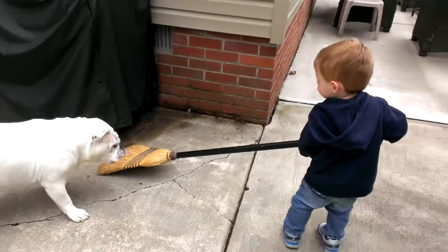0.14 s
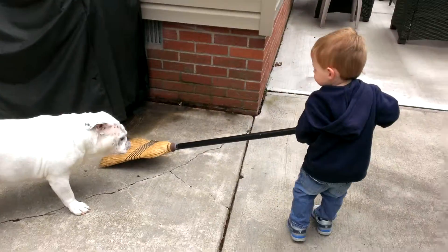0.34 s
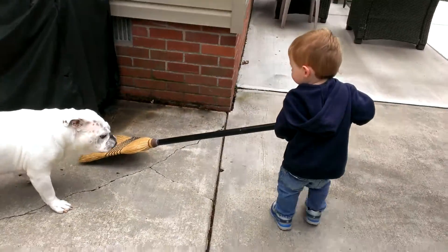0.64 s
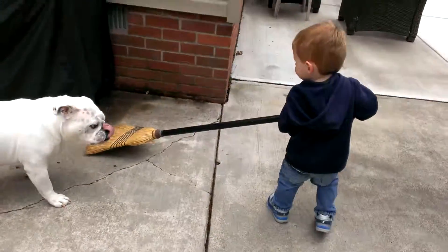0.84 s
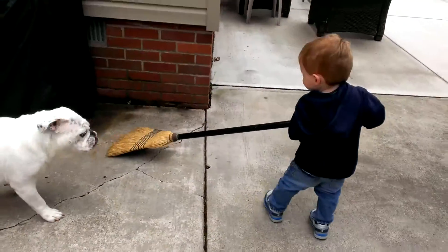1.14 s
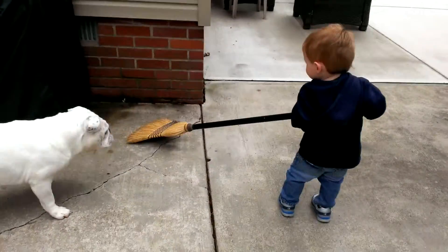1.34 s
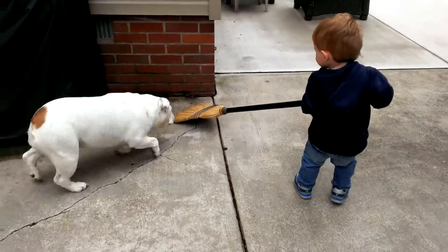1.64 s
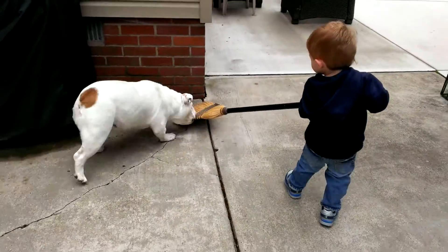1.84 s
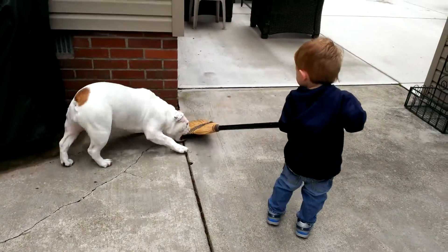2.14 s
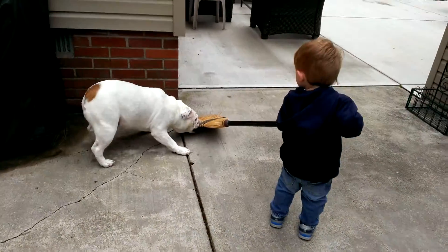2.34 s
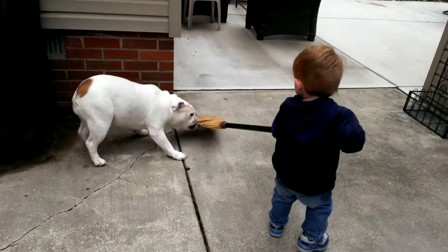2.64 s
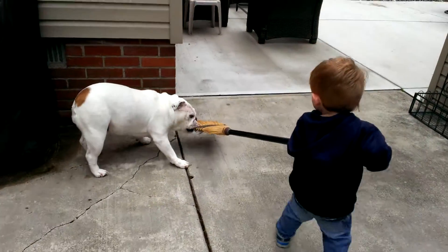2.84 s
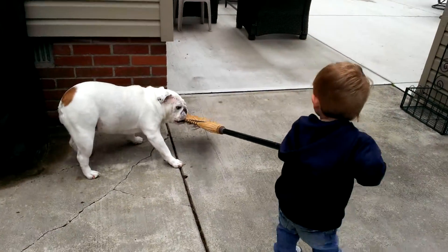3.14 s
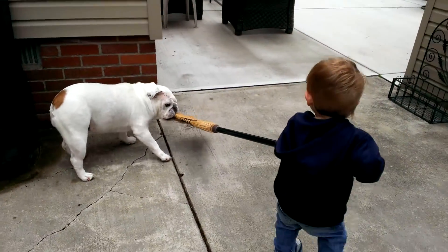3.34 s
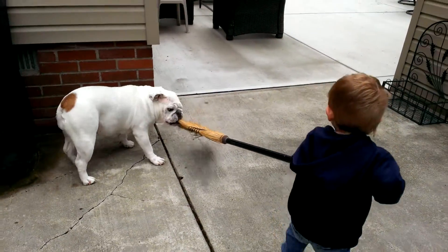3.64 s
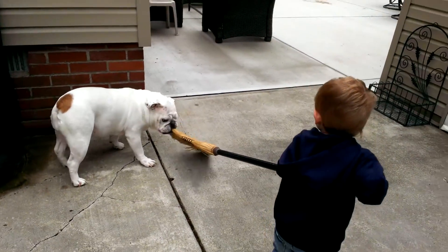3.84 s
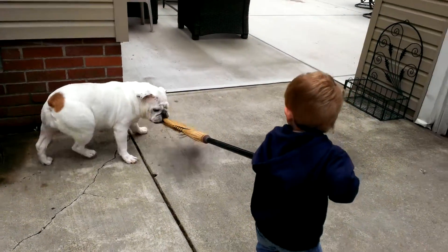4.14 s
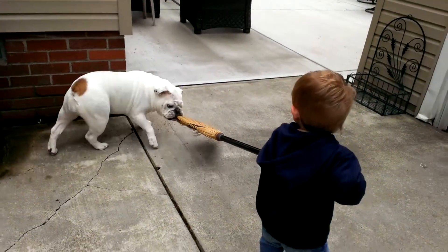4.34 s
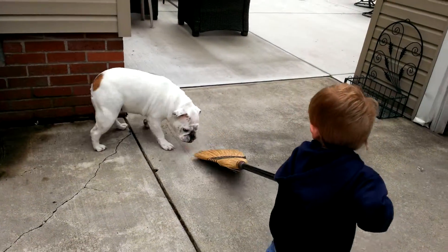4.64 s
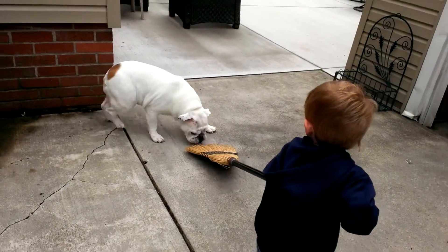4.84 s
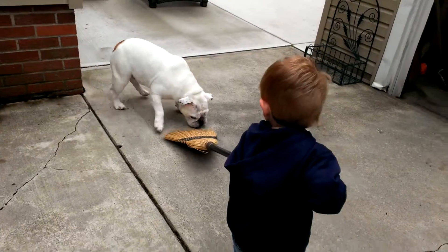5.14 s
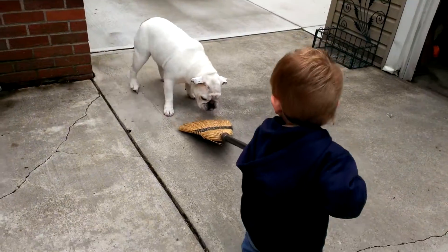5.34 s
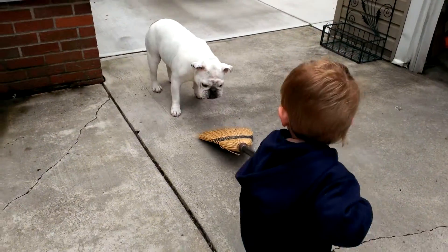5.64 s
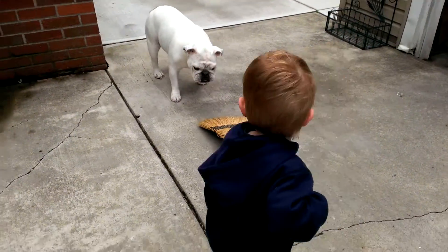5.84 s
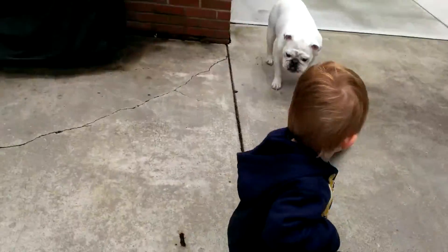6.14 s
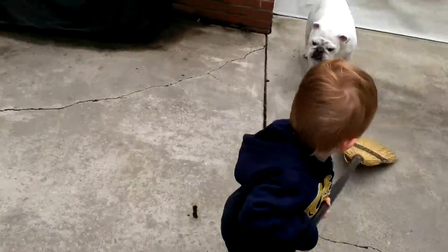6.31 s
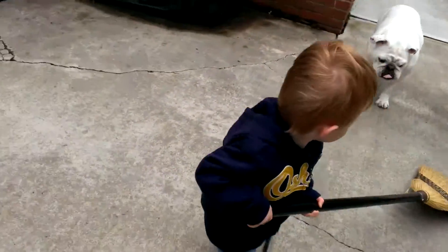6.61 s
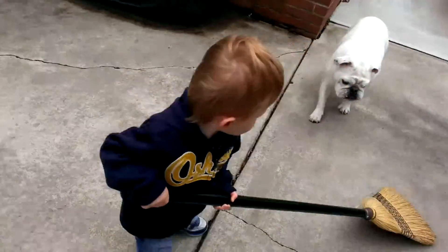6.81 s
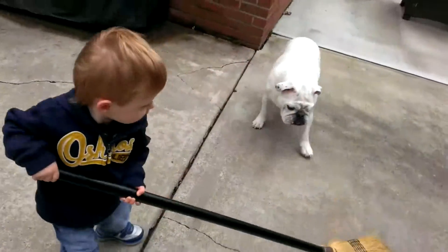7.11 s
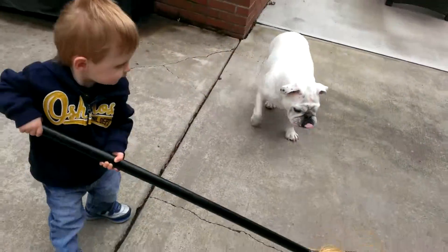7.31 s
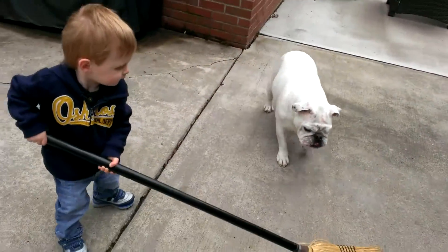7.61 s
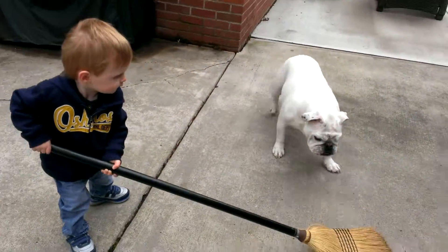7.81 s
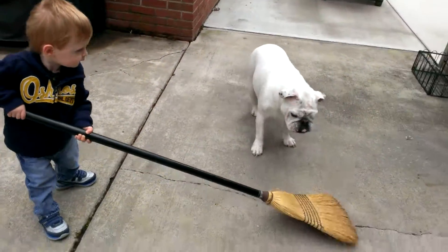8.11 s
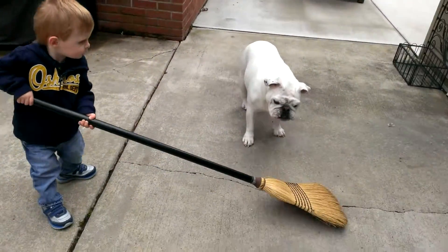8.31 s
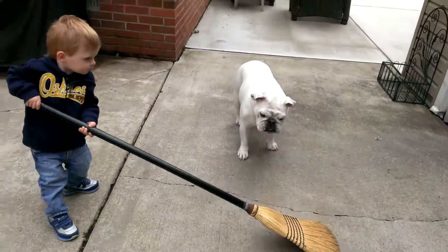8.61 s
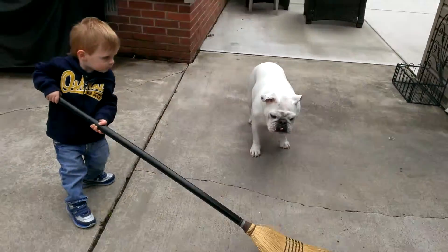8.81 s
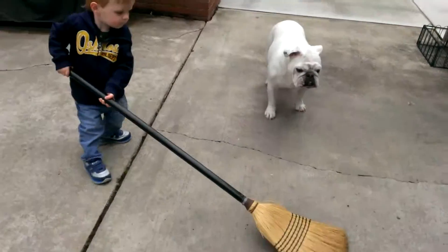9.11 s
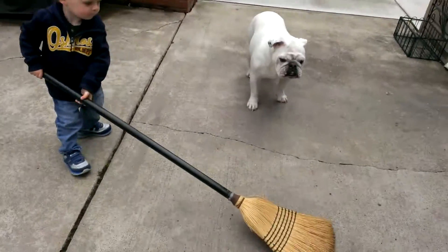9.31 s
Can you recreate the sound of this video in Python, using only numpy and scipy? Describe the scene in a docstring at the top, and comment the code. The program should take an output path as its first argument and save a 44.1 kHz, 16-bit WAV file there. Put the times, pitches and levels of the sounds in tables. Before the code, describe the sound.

A straw broom scrapes and hisses over rough concrete in uneven scuffs and long drags, with small knocks, straw snaps and close handling bumps.

```python
"""A concrete yard: a straw broom is dragged near a hand-held phone while a dog paws and bites at it.
The broom is noise shaped by the force on its straws, with snaps and gliding bands of noise on top.
Knocks are ringing modes; the dog's huffs and the fingers on the case are shaped, uneven noise.
Far traffic is broad noise and the hum a narrow band of it.
The phone hears through two ports of opposite polarity: a bright one (left) and a shaded one (right)."""
import sys
import numpy as np
from scipy.fft import rfft, irfft, next_fast_len
from scipy.io import wavfile
from scipy.ndimage import map_coordinates

SR = 44100
rng = np.random.default_rng(int(sys.argv[2]) if len(sys.argv) > 2 else 0)


def wav_record(signal):
    """Record a signal, one row per channel, as 16-bit PCM in the file named by sys.argv[1]."""
    frames = np.transpose(np.atleast_2d(signal))
    bounded = np.clip(frames, -1, 1)
    # unit amplitude maps onto the largest positive 16-bit level
    quanta = np.round(bounded * 32767).astype(np.int16)
    wavfile.write(sys.argv[1], SR, quanta)


N = 417186  # samples, about 9.46 s
TIME = np.arange(N) / SR  # seconds


def amp(db):
    """Turn dB into a plain gain."""
    return 10 ** (np.asarray(db) / 20)


def unit(x):
    """Rms 1 for a signal; for a pair, rms 1 for half of what both ports give."""
    share = .5 if x.ndim > 1 else 1
    return x / np.sqrt(np.mean(x ** 2) * share + 1e-20)


def along(points, hz):
    """Read each value column of a spectrum table on a log frequency axis."""
    point_hz, *columns = np.transpose(points)
    return np.squeeze([np.interp(np.log(hz + 1), np.log(point_hz + 1), c) for c in columns])


def curves(rows, time=TIME):
    """One value per moment for each column after the time."""
    seconds, *columns = np.transpose(rows)
    return np.array([np.interp(time, seconds, c) for c in columns])


def wobble(rate, size=N):
    """A smooth random curve through random points, rate points a second."""
    points = rng.standard_normal(int(size * rate / SR) + 4)
    return map_coordinates(points, [TIME[:size] * rate])


def filtered(x, response):
    """Multiply the spectrum of x by a response of frequency."""
    size = next_fast_len(N + 8192)
    hz = np.fft.rfftfreq(size, 1 / SR)
    return irfft(rfft(x, size) * response(hz), size)[..., :N]


def coloured(x, points):
    """Shape x with a spectrum table, silent well outside it, then bring it to unit level."""
    lowest_hz, highest_hz = points[0][0] / 2, 2 * points[-1][0]

    def response(hz):
        return amp(along(points, hz)) * (hz > lowest_hz) * (hz < highest_hz)

    return unit(filtered(x, response))


def sides(pan_db):
    """Gains of the two ports for a left-right difference in dB; their total power stays the same."""
    tilt = amp(np.multiply.outer([.5, -.5], pan_db))
    return tilt / np.cosh(pan_db * np.log(10) / 20) ** .5


def narrow(hz, width):
    """A narrow band of noise round a moving pitch, rms 1; a larger width makes it broader."""
    turns = 2 * np.pi * np.cumsum(hz) / SR
    in_step = wobble(width, size=len(hz)) * np.cos(turns)
    quarter_turn = wobble(width, size=len(hz)) * np.sin(turns)
    return unit(in_step + quarter_turn)


FADE_DB = 20  # what a rise or a fall covers in its time


def touch(full_at, rise, hold, fall, db):
    """Gain of one contact: it rises, holds and falls along straight lines in dB."""
    before = (full_at - TIME) / rise
    after = (TIME - full_at - hold) / fall
    return amp(db - FADE_DB * np.maximum(0, np.maximum(before, after)))


# Tone of the far sound. Each row: frequency in Hz, strength in dB.
YARD_SPECTRUM = [(25, -4.5), (45, -28.5), (70, 0), (110, 1.5), (200, -4.5), (400, -15), (1000, -17),
                 (2500, -26), (5000, -21), (10500, -39)]
# Loudness of the far sound. Each row: time in seconds, level in dB.
YARD_LEVEL = [(0, -60.5), (1, -60.5), (3, -62), (5.5, -59.5), (8.3, -60), (9.46, -58.5)]
# How alike the ports hear it. Each row: frequency in Hz, likeness from 0 to 1.
PORT_LIKENESS = [(30, 0.57), (100, 1), (400, 0.78), (1000, 0.57), (3000, 0.41), (10000, .1)]
# How far sound differs between the ports. Each row: frequency in Hz, left minus right in dB.
FAR_TILT = [(100, -2), (1000, 2.5), (3500, -3), (6000, 8), (10500, 25)]
# Loudness of the hum. Each row: time in seconds, level in dB.
HUM_LEVEL = [(0, -68.5), (2, -61.5), (4, -60), (5.3, -55.5), (7, -63), (9.46, -74)]


def yard():
    """Far traffic as broad noise, most alike in the ports near 100 Hz, and a wavering low hum."""
    common, *own = rng.standard_normal((3, N))
    shared = filtered(common, lambda hz: along(PORT_LIKENESS, hz) ** .5)
    separate = filtered(np.array(own), lambda hz: (1 - along(PORT_LIKENESS, hz)) ** .5)

    def far_response(hz):
        return amp(along(YARD_SPECTRUM, hz)) * sides(along(FAR_TILT, hz))

    far = unit(filtered(shared + separate, far_response))
    hum = amp(curves(HUM_LEVEL)[0]) * narrow(np.full(N, 112.), 22)  # round 112 Hz
    far_level_db = curves(YARD_LEVEL)[0] + 0.66 * wobble(4.4)
    return amp(far_level_db) * far + hum


# Fingers bump the case.
# Each row: full at this second, rise, hold and fall in seconds, level in dB, left minus right in dB.
BUMPS = [(0.858, 0.037, .003, 0.025, -40, -30), (1.082, 0.036, 0.026, 0.069, -54, -13),
         (8.741, 0.0064, 0.035, .12, -35, -1), (8.825, 0.048, 0.018, 0.18, -35.5, 1.5),
         (8.943, .015, .003, .07, -42.5, -6), (8.99, 0.03, .003, 0.09, -31.5, -4.5),
         (9.025, .04, 0.0028, 0.06, -31, 0.5), (9.084, 0.09, .012, 0.017, -39, -4),
         (9.341, 0.032, 0.025, 0.13, -49, -1)]
# Tone of a bump. Each row: frequency in Hz, strength in dB.
THUD_SPECTRUM = [(50, -19), (90, -2), (250, -5), (450, -12), (800, -18.5), (1500, -49)]
# Fingers rub the case. Each row: full at this second, rise, hold and fall in seconds, level in dB,
# left minus right in dB, speed from 0 to 1.
RUBS = [(0.861, 0.043, 0.019, .016, -42, -25, 0.51), (1.088, 0.019, 0.061, .028, -37.5, -26, 0.8),
        (3.13, .015, .025, .03, -61.5, 3, 0.4), (8.742, .007, 0.036, 0.1, -44.5, -1, 0.54),
        (8.828, 0.094, 0.025, 0.085, -48.5, -1, 0.2), (8.956, 0.033, 0.018, 0.036, -34, -27, 0.3),
        (8.986, 0.032, 0.011, 0.028, -32, -16, .65), (9.027, .04, .003, .1, -49.5, -4, 0.2),
        (9.083, 0.047, 0.017, .012, -43, -11, 0.1), (9.345, 0.078, .003, 0.066, -59, 2, 0.7)]
# Tone of a rub. Each row: frequency in Hz, strength of a slow rub in dB, of a fast rub in dB.
RUB_SPECTRA = [(402, -7, -26), (816, -0.5, -18.5), (1270, -1, -8), (1500, -6, 2), (1970, -24.5, 0),
               (2460, -9.5, -12.5), (3020, -9.5, -10), (5000, -35, -16.5), (8000, -41, -38)]


def grip():
    """Skin sticks and slips on the case: lumpy low thuds and rougher rubs, each leaning to a port."""
    common, *own = rng.standard_normal((3, N))
    lumps = amp(2.3 * wobble(60))
    thud = coloured(lumps * (common + 0.28 * np.array(own)), THUD_SPECTRUM)

    stick_slip = amp(2.0 * wobble(250))
    rub_noise = stick_slip * rng.standard_normal((2, 1, N))
    slow, fast = coloured(rub_noise, RUB_SPECTRA).swapaxes(0, 1)

    # the powers of all bumps add
    bump_power = sum((sides(pan_db)[:, None] * touch(*shape)) ** 2 for *shape, pan_db in BUMPS)
    out = np.sqrt(bump_power) * thud
    for *shape, pan_db, speed in RUBS:
        rub = (1 - speed) * slow + speed * fast  # a faster finger sounds brighter
        out += sides(pan_db)[:, None] * touch(*shape) * rub
    return out


# The dog breathes out.
# Each row: full at this second, rise, hold and fall in seconds, level in dB.
PANTS = [(0.543, .03, 0.2, .1, -59), (1.57, .04, 0.22, .1, -60), (2.806, 0.022, 0.21, 0.17, -58)]
# Tone of the snout. Each row: frequency in Hz, strength in dB.
SNOUT_SPECTRUM = [(700, -25), (1000, -7), (1150, 2), (1350, 4), (1550, 2), (1900, -5), (2600, -21),
                  (3200, -4), (3700, -24)]


def dog():
    """Soft, uneven breath noise, coloured by a short snout."""
    flutter = amp(2.5 * wobble(40.46))
    air = coloured(flutter * rng.standard_normal(N), SNOUT_SPECTRUM)
    return sides(1.5)[:, None] * sum(touch(*row) for row in PANTS) * air


# Teeth, claws, shoes and the handle knock, and fingers knock the phone case.
# Each row: start in seconds, level in dB, pitch in Hz, time to fade by 60 dB in seconds,
# left minus right in dB.
KNOCKS = [(.295, -48, 983, 0.089, -1), (0.392, -31, 193, 0.04, -15), (.98, -39.5, 650, 0.094, 2.5),
          (1.304, -47.5, 743, 0.087, 3), (1.751, -36, 2600, 0.069, -4), (1.907, -47, 298, .03, 6),
          (2.162, -44.5, 760, 0.095, 5), (2.164, -48.5, 200, .05, -1), (2.697, -35.5, 2330, 0.0098, 11),
          (3.165, -36, 203, 0.05, 0.5), (3.2345, -20.5, 2130, 0.013, -9), (3.2375, -19, 1900, 0.005, -18),
          (3.2403, -22, 2540, 0.015, 17.5), (3.251, -32, 2430, 0.031, -3), (3.85, -52.5, 694, 0.066, 5),
          (3.85, -52, 2500, 0.028, -7), (4.994, -37.5, 162, 0.064, -8), (5.9, -46, 3030, 0.016, -12),
          (6.077, -32.5, 298, 0.027, 12), (6.14, -41, 1980, .015, 10), (6.164, -45, 490, 0.027, 4),
          (6.612, -26, 2700, 0.0089, -22), (6.635, -31, 2470, 0.012, -21), (6.668, -26.5, 249, 0.023, -12),
          (6.669, -28, 1700, 0.0049, -22), (6.683, -36, 2220, 0.013, -12), (7.355, -29, 191, 0.044, -6.5),
          (7.72, -34, 199, 0.037, -3), (7.768, -34, 1540, 0.017, 2), (7.773, -35, 2200, 0.015, 5),
          (8.735, -23.5, 250, 0.075, -0.5), (8.753, -24.5, 253, 0.086, 11), (8.765, -34, 298, 0.06, -8),
          (8.797, -38, 330, 0.046, 12), (8.991, -25, 1026, 0.028, 13), (9.023, -36, 443, 0.033, 11),
          (9.321, -41, 2040, 0.039, 2)]
# Modes of a knocked thing, before small random changes.
# Each row: multiple of the knock's pitch, strength in dB.
BODY_MODES = [(.5, -13.5), (0.649, -10), (.8, -2), (.93, -2), (1.08, 3), (1.3, -2.5), (1.6, -7.5),
              (2.05, -9), (2.7, -13.5)]


def knocks():
    """A knock rings the modes round its pitch; the contact eases in over less than two cycles."""
    out = np.zeros((2, N + SR))
    t = np.arange(SR // 8) / SR
    ratio, mode_db = np.transpose(BODY_MODES)[:, :, None]
    for start, db, hz, t60, pan_db in KNOCKS:
        shift, level, phase = rng.standard_normal((3, len(BODY_MODES), 1))
        mode_hz = hz * ratio * np.exp(0.0507 * shift)
        modes = amp(mode_db + 4.0 * level) * np.sin(2 * np.pi * mode_hz * t + 1.21 * phase)
        ring = unit(modes.sum(axis=0))
        contact = np.sin(np.pi / 2 * np.clip(t * hz / 1.67, 0, 1)) ** 2
        fade = amp(db - 60 * t / t60)
        out[:, round(start * SR):][:, :len(t)] += sides(pan_db)[:, None] * fade * contact * ring
    return out[:, :N]


# Gliding bands of broom noise, coloured by reflections off floor or wall as the broom moves.
# Each row: start in seconds, length in seconds, first pitch in Hz, last pitch in Hz,
# rough width in Hz, top level in dB, share of the length (0 to 1) at which it is loudest.
GLIDES = [(0.906, 0.41, 3560, 3740, 400, -55, 0.27), (1.296, 0.48, 3820, 3850, 501, -64, 0.76),
          (4.27, 0.21, 4180, 4100, 450, -63, .5), (4.323, 0.18, 3300, 3300, 895, -60.5, 0.75),
          (5.497, 0.33, 3720, 3350, 421, -57.5, .3), (5.504, 0.2, 4200, 4000, 596, -57, .6),
          (6.36, .42, 3650, 4150, 280, -52.5, 0.54), (6.38, .75, 4300, 5100, 297, -56, .4),
          (6.422, .35, 9250, 9150, 700, -45, .4), (6.9, .46, 9400, 8820, 700, -39, .35),
          (6.849, .55, 5600, 6900, 500, -53, .7), (6.7, .75, 3700, 4820, 300, -49, 0.31),
          (7.0, .54, 3470, 3900, 303, -48, 0.77), (7.979, 0.29, 3300, 3200, 1300, -56, .5),
          (8.399, .5, 3950, 3910, 451, -54, .4)]
SWELL_DB = 8.5  # how far under its top level a glide starts and ends
GLIDE_PAN_DB, PAN_DB_PER_KHZ = -14, 8  # left minus right at 4 kHz; higher pitch favours the bright port


def glides():
    """Reflections off floor or wall colour the moving broom: narrow noise bands glide, swell and go."""
    out = np.zeros((2, N))
    for start, length, first_hz, last_hz, width_hz, db, top in GLIDES:
        progress = np.linspace(0, 1, round(length * SR))
        size = len(progress)
        swell_db = db - SWELL_DB * np.interp(progress, [0, top, 1], [1, 0, 1])
        hz = first_hz + (last_hz - first_hz) * progress
        ports = sides(GLIDE_PAN_DB + PAN_DB_PER_KHZ * (hz / 1000 - 4))
        band = narrow(hz + 60 * wobble(25, size=size), width_hz)  # the pitch wavers
        out[:, round(start * SR):][:, :size] += ports * amp(swell_db) * band
    return out


# Long drags of the broom, one list each. Each row: time in seconds, tip hiss in dB,
# stalk rasp in dB against the hiss, head drag in dB against the hiss.
DRAGS = [
    [(.84, -69.5, 1.5, -16), (1.0, -46.5, -6.5, -10), (1.15, -45.5, -5, -10), (1.4, -47.5, -5.5, -16),
     (1.71, -48.5, -2.5, -13), (1.76, -43, -5, -16), (1.8, -53.5, -1.5, -11.5), (2.0, -63.5, -2, -6)],
    [(6.11, -63.5, -9, -2.5), (6.32, -49.5, -16, -12.5), (6.44, -38, -26, -23.5), (6.59, -35.5, -27.5, -24),
     (6.8, -38, -20.5, -18), (7.03, -34, -22, -26.5), (7.32, -36.5, -14, -19.5), (7.4, -41.5, -8.5, -12.5),
     (7.48, -41.5, -9.5, -19), (7.56, -59.5, -12, -7)],
    [(8.14, -83.5, 11, 18), (8.27, -53, -7.5, -15), (8.32, -49.5, -11, -17), (8.43, -53, -2, -14),
     (8.77, -48, -2.5, -17), (8.95, -43, -6, -22), (9.06, -47, -8.5, -9), (9.1, -57, -5, 2),
     (9.27, -74.5, -2, -6)],
]
# Short scuffs of the broom. Each row: full at this second, rise, hold and fall in seconds,
# tip hiss in dB, stalk rasp in dB against the hiss, head drag in dB against the hiss.
SCUFFS = [(0.175, 0.53, 0.19, 0.078, -57, -1, -7.5), (0.497, 0.16, 0.0043, .12, -65, 0.5, -2),
          (0.663, 0.16, 0.26, .2, -73, 6, 4.5), (2.028, 0.034, 0.11, 0.18, -52, -0.5, -14),
          (2.288, 0.064, 0.042, 0.17, -46, -4, -17.5), (2.501, 0.11, .01, 0.095, -55, -4.5, -13),
          (2.641, .025, 0.011, 0.086, -58, -9, -5.5), (2.922, 0.029, .005, 0.3, -65, -7.5, -8),
          (3.19, 0.083, 0.052, 0.27, -63, -1.5, 3), (3.243, 0.032, 0.019, 0.038, -46.5, -19, -11),
          (3.706, 0.17, .02, 0.25, -66.5, -3.5, -5), (3.85, 0.032, 0.018, 0.067, -68.5, -1.5, -2),
          (4.043, 0.18, .05, 0.15, -67.5, -4.5, -20), (4.098, .04, .02, 0.04, -62.5, -1, -3.5),
          (4.38, 0.24, .005, 0.25, -58, -4.5, -9.5), (4.559, 0.029, .005, 0.052, -52.5, -7.5, -32),
          (4.639, 0.035, .05, 0.11, -49.5, -6, -23), (4.821, 0.03, .005, 0.029, -54.5, -5.5, -10),
          (4.86, 0.11, 0.18, 0.078, -62.5, -5.5, -24), (5.09, 0.066, .005, 0.033, -59.5, -5, -13),
          (5.145, 0.035, .05, 0.028, -51.5, -9, -14), (5.217, .06, 0.046, 0.12, -63.5, 3, -13),
          (5.302, .04, 0.0055, 0.09, -51.5, -5, -15), (5.413, 0.35, .21, 0.41, -59, -0.8, -25),
          (5.584, .12, .02, 0.18, -62, 1, 1.5), (5.952, .27, 0.15, .3, -60.5, -8.5, -8),
          (7.655, 0.42, .005, 0.19, -49.5, -6.5, -15.5), (7.758, 0.13, .005, 0.062, -51, -8, -5.5),
          (7.79, .1, 0.12, 0.099, -54.5, -6.5, -16), (7.984, 0.26, 0.098, 0.059, -54.5, -7, -13.5),
          (9.365, 0.068, 0.11, .1, -50, -3.5, -16)]
# The broom barely touching, one row: hiss, rasp and drag in dB.
REST_DB = [-89, -89, -70.5]


def pressure():
    """Gains of hiss, rasp and drag: the powers of all contacts add."""
    power = np.zeros((3, N)) + amp(REST_DB)[:, None] ** 2
    for rows in DRAGS:
        hiss_db, stalk_db, head_db = curves(rows)
        during = (TIME > rows[0][0]) * (TIME < rows[-1][0])
        power += amp([hiss_db, hiss_db + stalk_db, hiss_db + head_db]) ** 2 * during
    for *shape, stalk_db, head_db in SCUFFS:
        power += (amp([[0], [stalk_db], [head_db]]) * touch(*shape)) ** 2
    return np.sqrt(power)


# Snaps of straw and claws. Each row: start in seconds, level in dB before SNAP_TRIM_DB,
# stalk in dB against that level, head in dB against that level.
SNAPS = [(0.314, -35.5, -6, -13), (.7108, -47, -1, -13), (1.7509, -25.5, -23, -27), (1.8876, -37, -14, -21),
         (1.921, -39.5, 0, -14), (2.0158, -37, -19, -24), (2.2166, -33, -7, -10.5),
         (2.4583, -38.5, -1, -28), (2.499, -36.5, -3, -26), (2.5555, -42.5, 1.5, -0.5),
         (2.6364, -37, -3.5, -18), (2.696, -49, 1.5, -2), (3.3598, -43, -13, -24), (3.675, -46, -3, -15),
         (3.714, -43.5, -14, -19), (4.065, -46, -6, -19), (4.5595, -36, -19, -36), (4.6794, -39, -14, -33),
         (4.8155, -43, -14, -21), (4.8963, -39, 0, -11), (5.062, -40, -11, -12),
         (5.1334, -28.5, -14.5, -26), (5.1664, -42, -21, -23), (5.1767, -31, -17, -29),
         (5.295, -33, -4.5, -41), (7.6547, -28, -18, -30), (7.6964, -30, -18, -22),
         (7.748, -29.5, -15, -10), (7.846, -34, -20, -26), (7.9606, -29, -9, -28), (7.985, -26, -10, -31),
         (8.0187, -29.5, -6.5, -25), (9.1508, -38.5, -14, -5), (9.3204, -38.5, 9, -14),
         (9.416, -30, -19, -30)]
SNAP_TRIM_DB, SNAP_SHADED_DB = -7.0, -14  # for the whole snap; for its extra part in the shaded port
SNAP_T60_S, SNAP_RISE_S = 0.031, .0011
# Tones of the straw tips, the stalks, the shaded port's extra part and the broom head.
# Each row: frequency in Hz, strength in the left port in dB, in the right port in dB.
TIP_SPECTRUM = [(4350, -22, -35.5), (5360, -51, -22.5), (6700, -11, -19.5), (7620, -3, -24), (9260, 8, -35),
                (10300, -2.5, -35), (10890, -2.5, -34)]
STALK_SPECTRUM = [(3660, -31, -25.5), (4920, 3, -23.5), (5970, 2, -10), (6230, 2, -23), (7180, -6.5, -23),
                  (8100, -8, -28)]
SHADED_SPECTRUM = [(2060, -47, -44.5), (3080, -12.5, 2.5), (3760, -7, 5.5), (4600, -6.5, 2),
                   (5900, -40, -15.5)]
HEAD_SPECTRUM = [(298, -5, -5), (684, -9.5, -6), (1590, 2.5, -0.5), (2750, -0.5, 0), (3440, -18, -19.5)]
# How bright the tip hiss is as the straws bend. Each row: time in seconds, guide frequency in Hz.
BRIGHTEST = [(0, 9500), (1.1, 9450), (2.5, 10360), (3, 9400), (4.5, 10500), (5.3, 9650), (5.9, 8400),
             (6.35, 9650), (6.9, 9830), (7.2, 9300), (7.45, 9000), (7.7, 9400), (8.4, 8960), (9.46, 9170)]
# The phone and broom turn.
# Each row: time in seconds, level of the shaded part in dB while the hiss is at -60 dB.
SHADED_LEVEL = [(0, -64.5), (1.1, -61), (1.5, -65), (2.4, -65), (2.9, -67.5), (3.25, -65), (4.0, -71),
                (4.4, -69.5), (4.6, -70.5), (5.4, -70.5), (5.62, -69), (5.9, -66), (6.5, -67), (7.4, -65.5),
                (7.9, -67), (8.15, -61), (8.4, -66), (9.1, -63), (9.46, -64.5)]
SHADED_GROWS = 0.54  # dB in the shaded part for each dB of hiss
# The phone turns. Each row: time in seconds, delay of the left port in seconds.
LEFT_LAG = [(0, -.0004), (3.7, -.0004), (4.2, .0001), (6, .00017), (9.46, .00016)]


def broom():
    """Straws catch on the grit and let go, as clumpy noise; both ports hear partly the same slips."""
    hiss, stalk, head = pressure()
    shaded = amp(curves(SHADED_LEVEL)[0]) * (hiss * 1000) ** SHADED_GROWS
    force = np.array([hiss, stalk, shaded, head])

    t = np.arange(SR // 8) / SR
    rise = 1 - np.exp(-t / SNAP_RISE_S)
    for start, db, stalk_db, head_db in SNAPS:
        at = round(start * SR)
        part_db = np.array([[0], [stalk_db], [SNAP_SHADED_DB], [head_db]])
        burst = amp(db + SNAP_TRIM_DB + part_db - 60 * t / SNAP_T60_S) * rise
        force[:, at:at + len(t)] = np.hypot(force[:, at:at + len(t)], burst[:, :N - at])

    # uneven grit: slips come in clumps
    catch = amp(1.03 * wobble(900) + 0.56 * wobble(120) + 0.51 * wobble(30))
    common, *own = rng.standard_normal((3, N))
    share = .36  # of the power is the same in both ports
    slips = catch * (share ** .5 * common + (1 - share) ** .5 * np.array(own))
    left_position = np.arange(N) - curves(LEFT_LAG)[0] * SR
    slips[0] = map_coordinates(slips[0], [left_position], order=1)

    # the tip hiss moves between a lower and a higher copy of its spectrum
    dull = coloured(slips, np.multiply(TIP_SPECTRUM, [.92, 1, 1]))
    keen = coloured(slips, np.multiply(TIP_SPECTRUM, [1.07, 1, 1]))
    mix = np.clip((curves(BRIGHTEST)[0] - 8400) / 1700, 0, 1)
    layers = [(1 - mix) * dull + mix * keen]
    layers += [coloured(slips, s) for s in (STALK_SPECTRUM, SHADED_SPECTRUM, HEAD_SPECTRUM)]
    return sum(f * amp(0.7 * wobble(14)) * layer for f, layer in zip(force, layers))


def scene():
    """Everything heard in the yard, added up."""
    return yard() + grip() + dog() + knocks() + glides() + broom()


TOP_HZ = 10600  # band limit


def record(dry):
    """The right port is inverted and a little turned in phase; nothing is kept above the band limit."""
    turn = np.array([[1], [-np.exp(-1j * 0.79)]])  # 0.79 radians
    return filtered(dry, lambda hz: turn * (hz < TOP_HZ))


dry = scene()
out = record(dry)
wav_record(out)
```